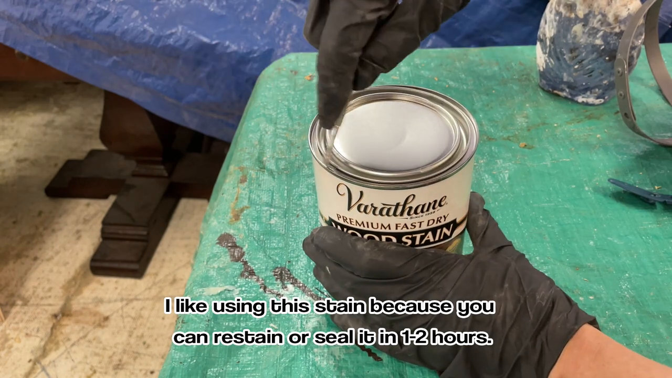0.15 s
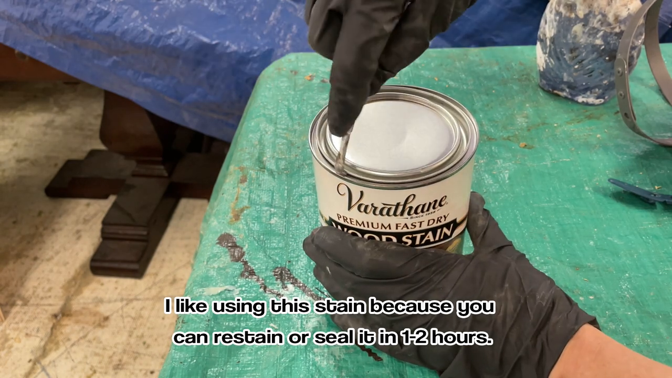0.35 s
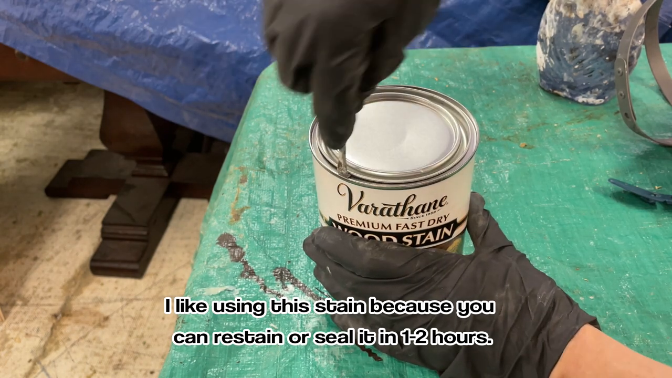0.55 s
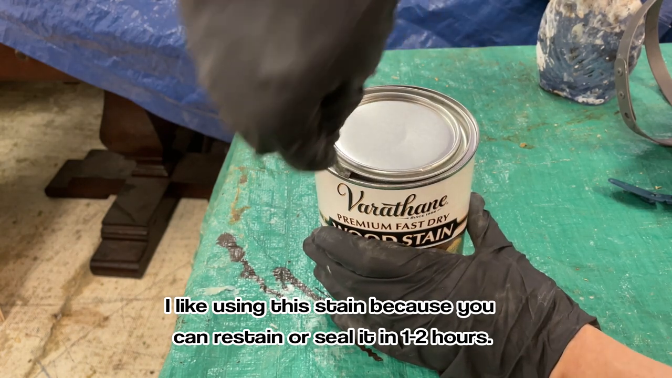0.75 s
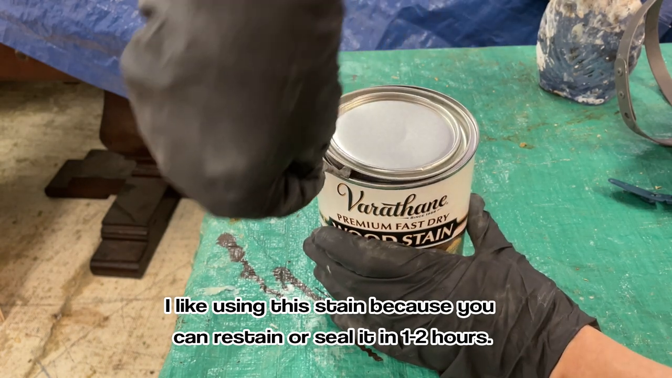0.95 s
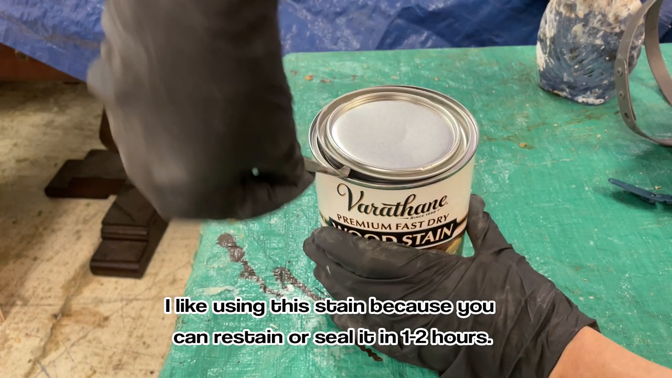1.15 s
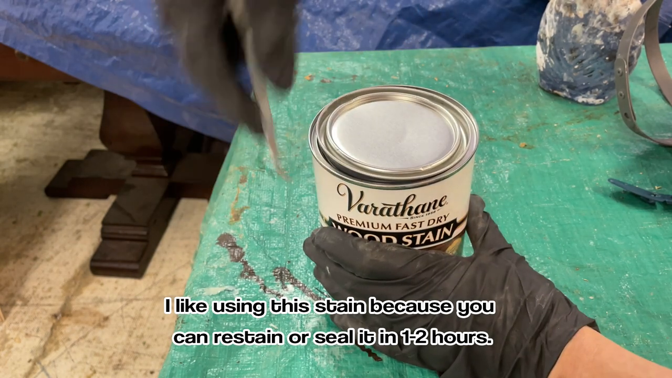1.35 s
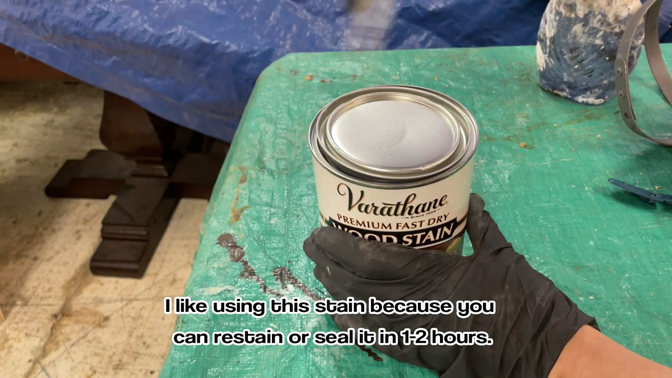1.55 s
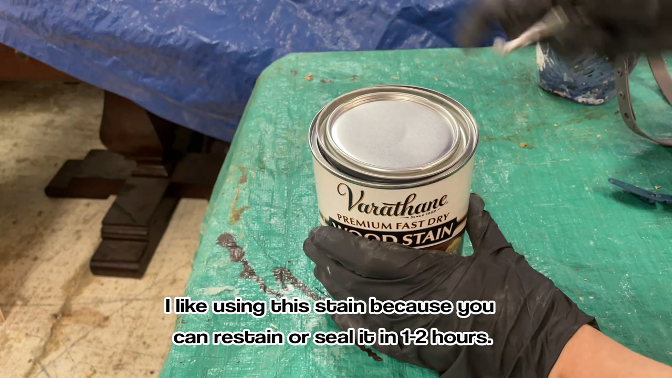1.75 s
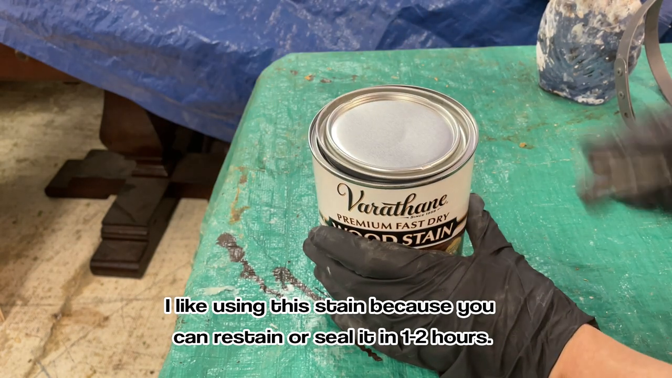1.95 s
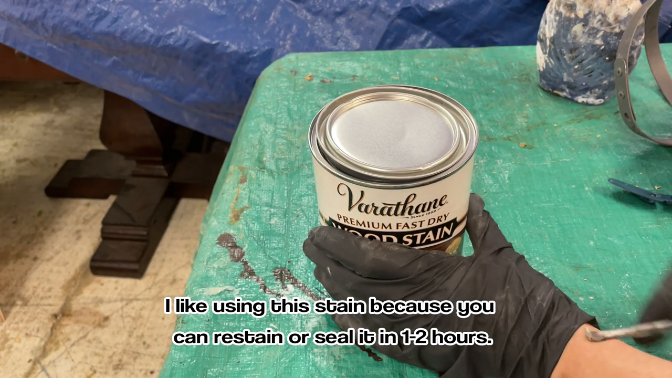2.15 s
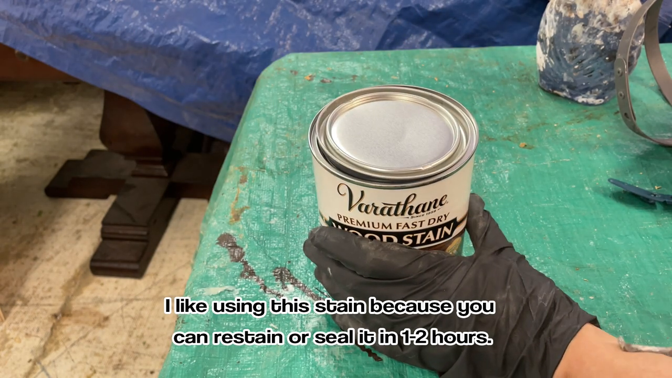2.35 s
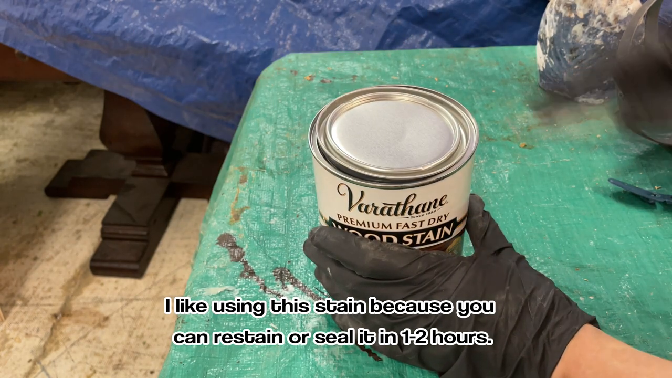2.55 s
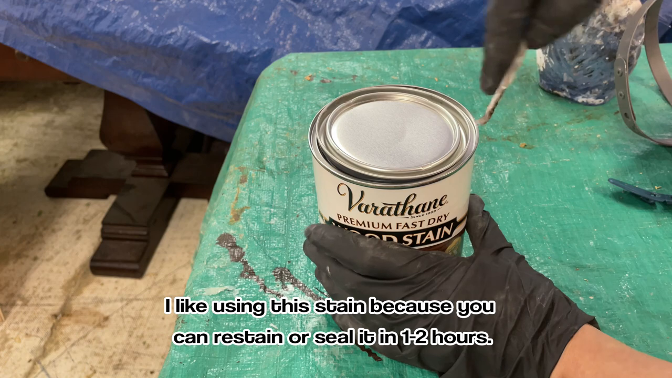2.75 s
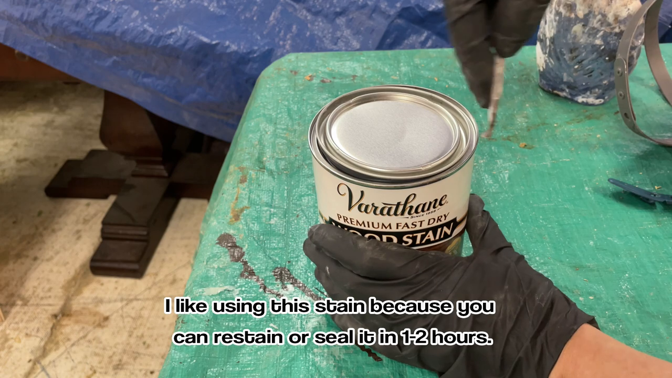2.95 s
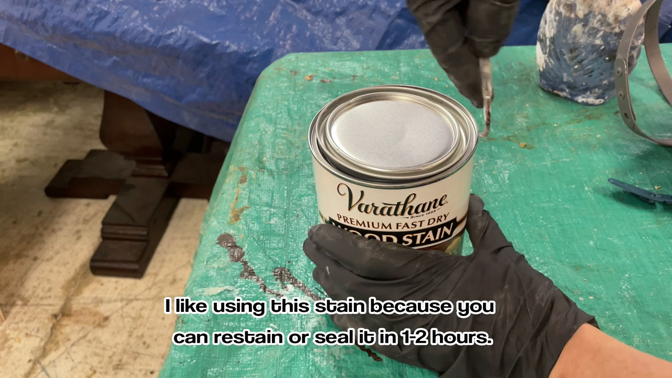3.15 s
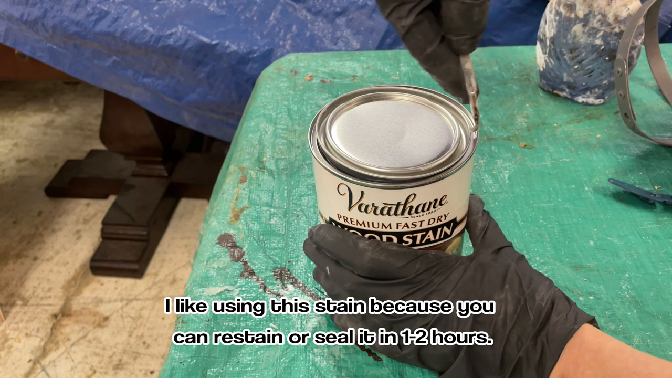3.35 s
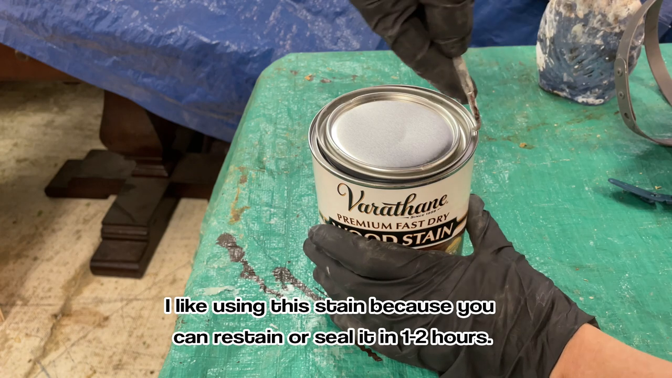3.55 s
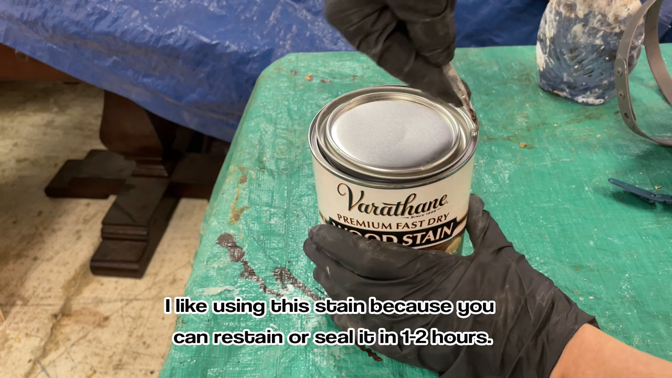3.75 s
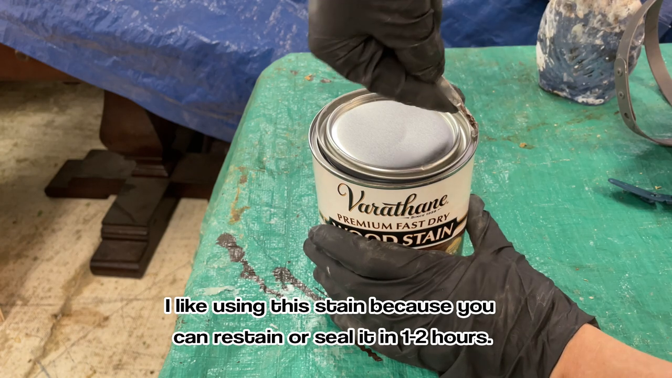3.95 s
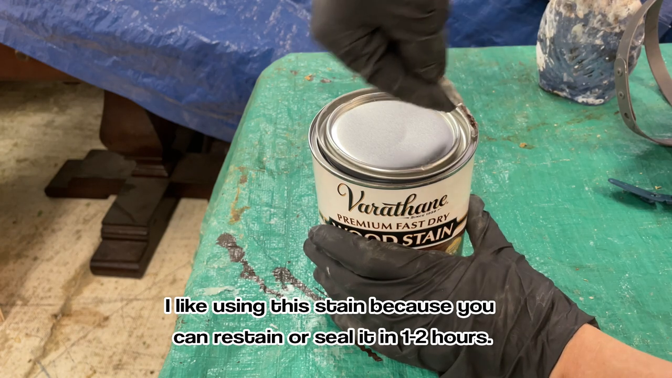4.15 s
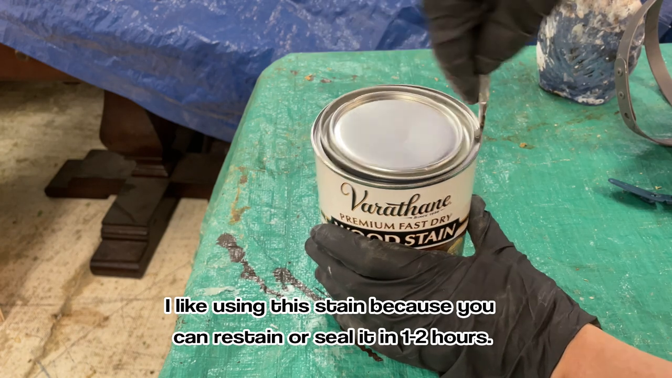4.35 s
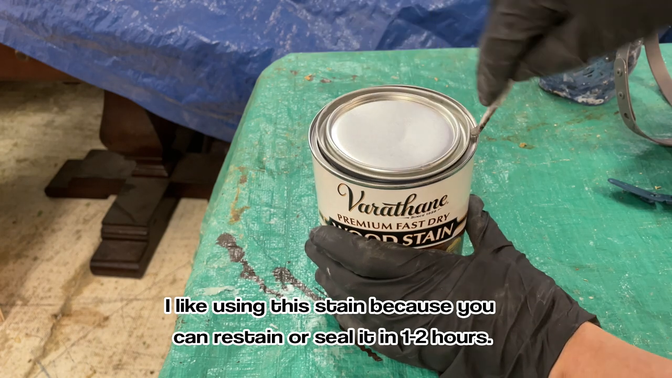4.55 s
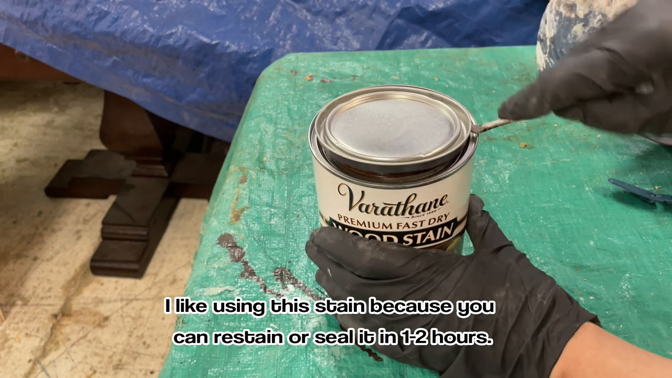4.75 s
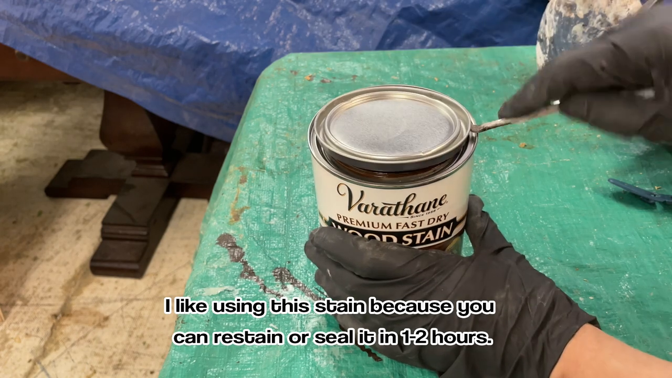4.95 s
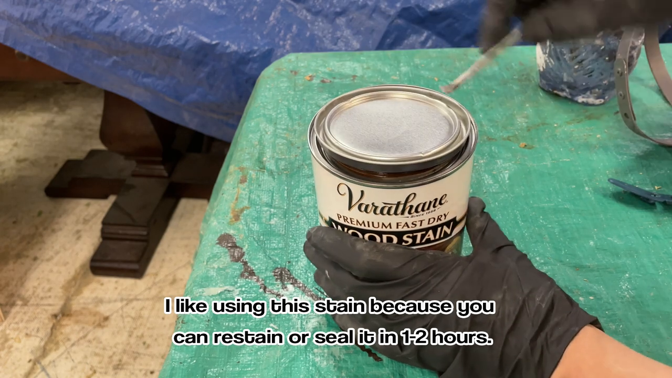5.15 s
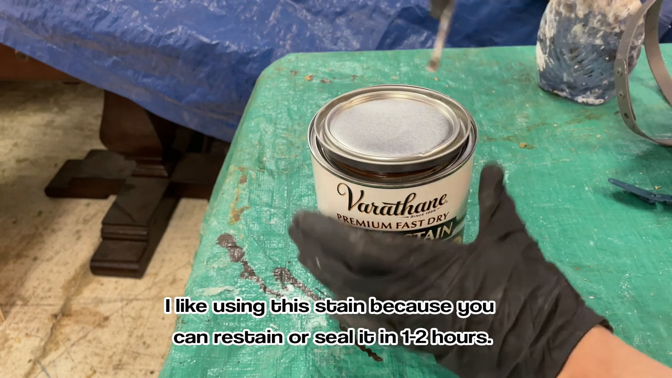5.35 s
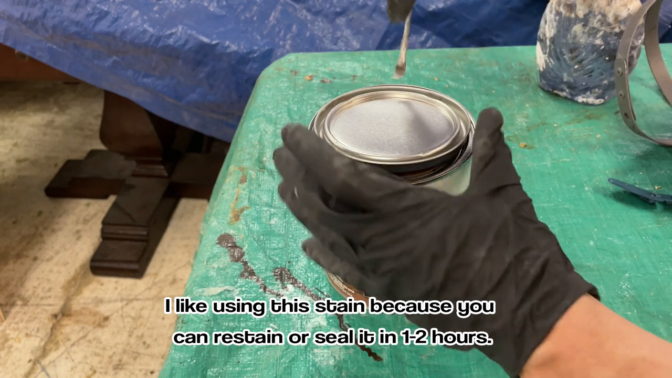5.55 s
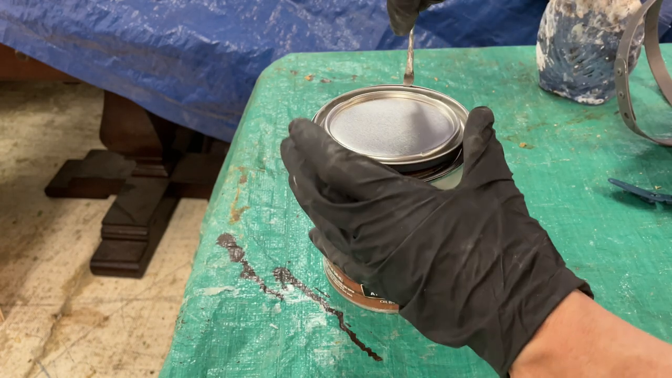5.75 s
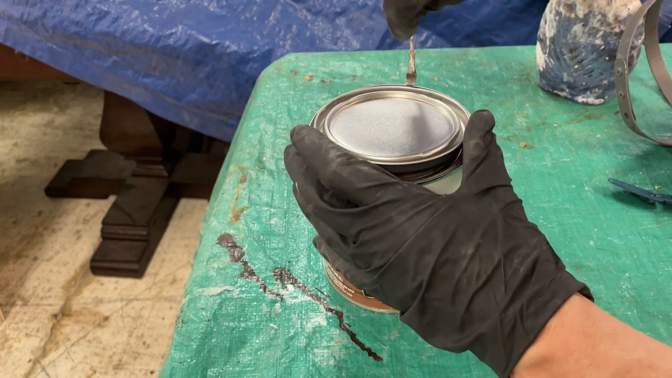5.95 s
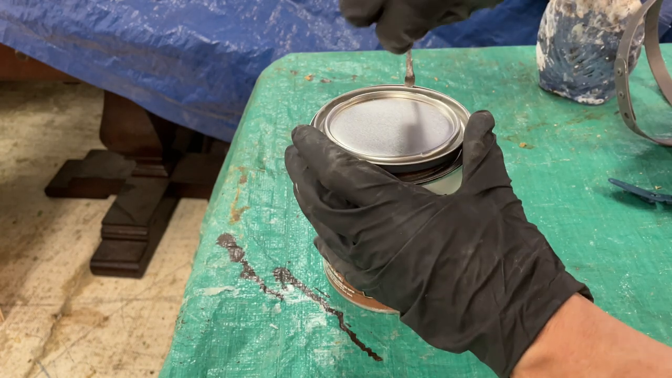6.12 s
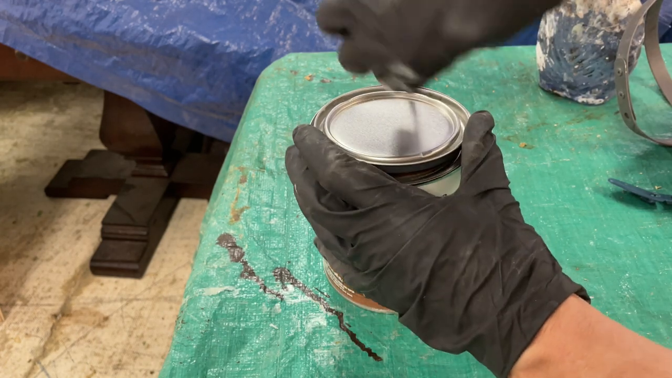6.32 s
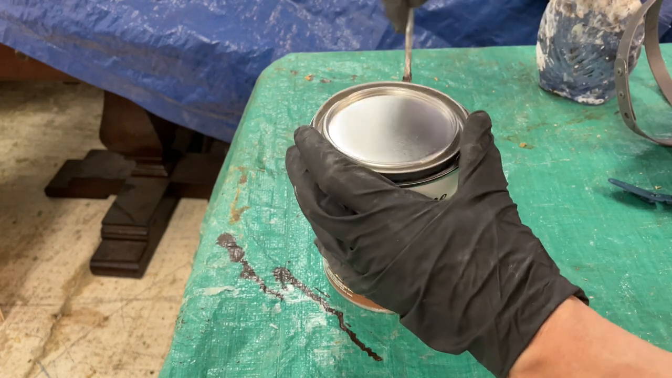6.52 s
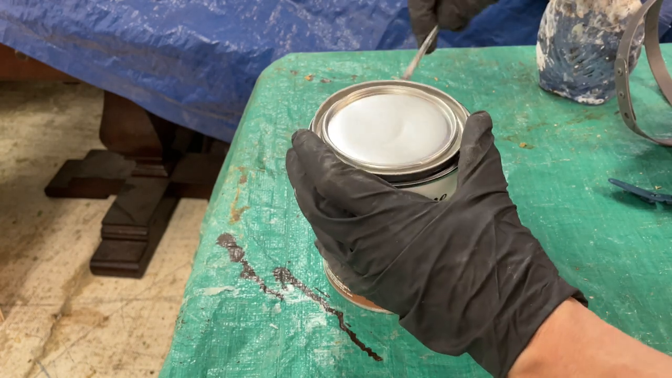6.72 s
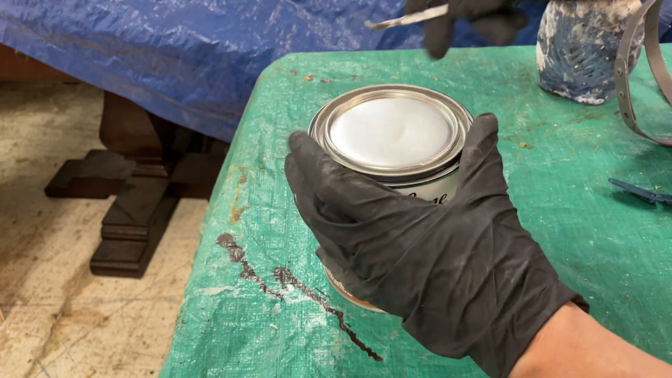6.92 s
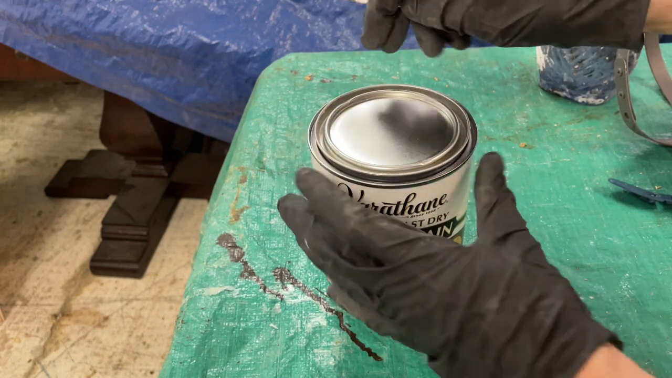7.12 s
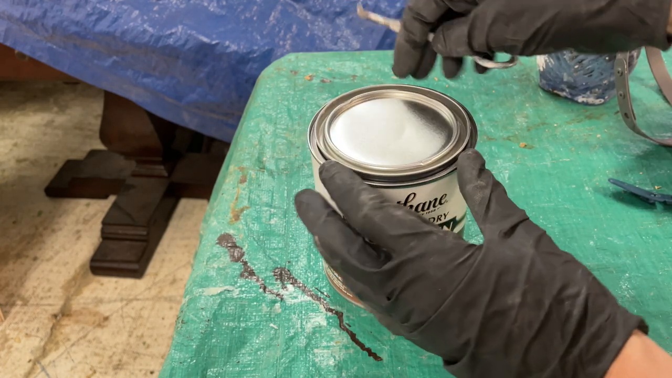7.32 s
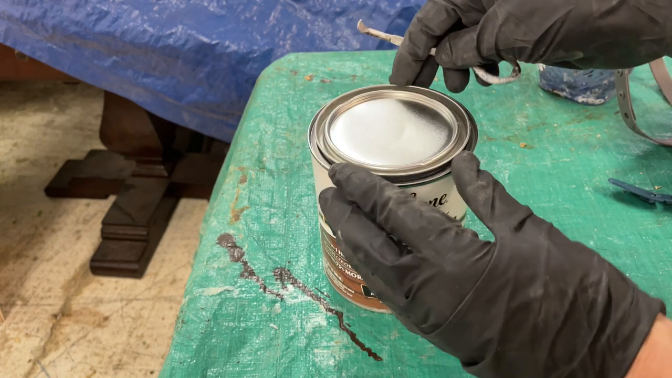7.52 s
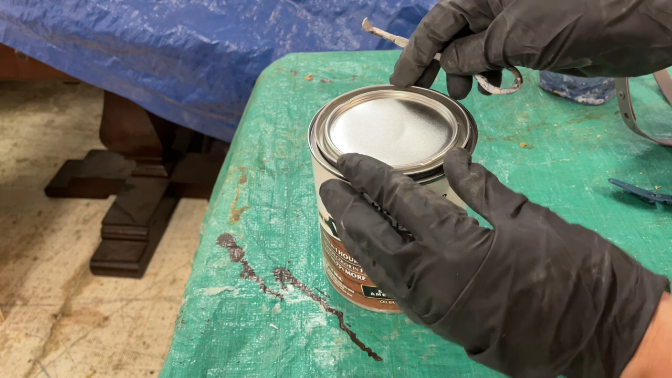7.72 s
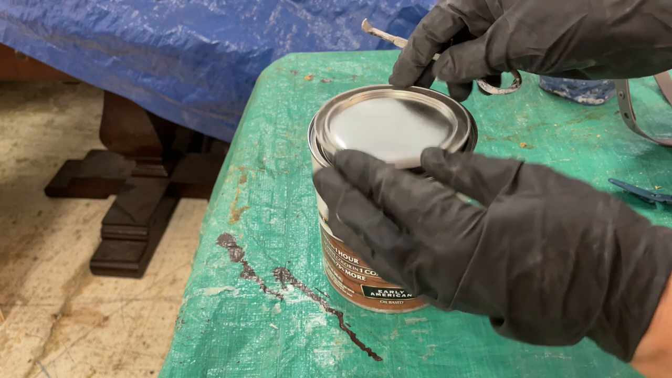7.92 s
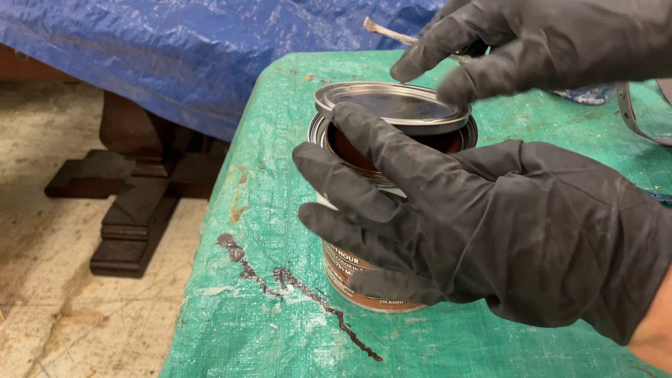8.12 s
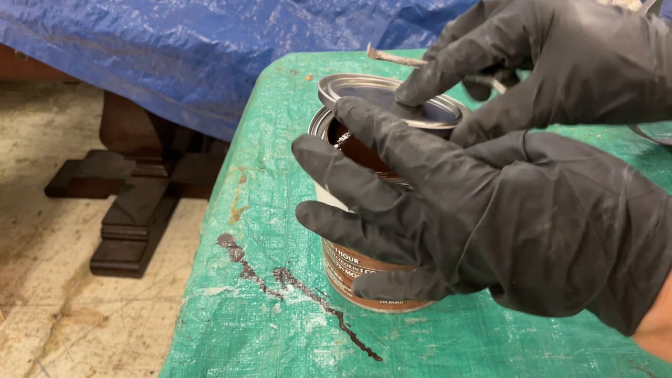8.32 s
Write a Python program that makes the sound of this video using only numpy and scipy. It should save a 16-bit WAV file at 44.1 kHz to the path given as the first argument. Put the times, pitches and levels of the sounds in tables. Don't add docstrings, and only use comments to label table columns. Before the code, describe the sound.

In a small workshop, a steel tool clicks and ticks against the rim of a full tin held in a rubber glove. Gloves rustle, then come more taps and one hard bright clack. A low, round pop marks the seal giving way, followed by a rough scraping drag and looser, more ringing clinks. The end is quiet rubbing and finger ticks. A low fan hum continues throughout; close stereo phone pickup with short room reflections.

```python
import sys
import numpy as np
from scipy import signal
from scipy.fft import rfft, irfft
from scipy.io import wavfile
from scipy.ndimage import uniform_filter1d

SR = 44100
rng = np.random.default_rng(int(sys.argv[2]) if len(sys.argv) > 2 else 0)


def store_wav(level_fs):
    pcm = np.round(np.clip(np.atleast_2d(level_fs), -1, 1) * 32767)
    wavfile.write(sys.argv[1], SR, pcm.T.astype(np.int16))


def gain_from_db(level_db):
    decades = np.asarray(level_db, float) / 20
    return 10 ** decades


N = 373968
FREQ = np.fft.rfftfreq(N, 1 / SR)


def shape(points, hz):
    f, db = np.transpose(points)
    return np.interp(np.log(np.maximum(hz, 1)), np.log(f), db)


def shaped(x, points):
    return irfft(rfft(x) * gain_from_db(shape(points, np.fft.rfftfreq(len(x), 1 / SR))), len(x))


def colour(x, points):
    y = shaped(x, points)
    return y / np.sqrt(np.mean(y ** 2))


def unit(x):
    return x / np.sqrt(np.sum(x ** 2))


def add(out, s, x):
    i = int(s * SR)
    out[i:i + len(x)] += x[:N - i]


def grains(rate, spread_db):
    slipping = rng.random(N) < rate / SR
    return slipping * rng.standard_normal(N) * gain_from_db(spread_db * rng.exponential(size=N))


def walk(rate):
    k = int(SR / rate)
    steps = np.repeat(rng.standard_normal(N // k + 1), k)
    return 1.72 * uniform_filter1d(uniform_filter1d(steps, k), k)[:N]


def swell(s, db, rise_s, fall_s, sharpness=1):
    out = np.zeros(N)
    for at, top_db, rise, fall in zip(s, db, np.maximum(rise_s, 1e-3), np.maximum(fall_s, 1e-3)):
        i = np.arange(max(int((at - 2 * rise) * SR), 0), min(int((at + 2 * fall) * SR), N))
        away = np.maximum((at - i / SR) / rise, (i / SR - at) / fall)
        out[i] += gain_from_db(top_db - 20 * sharpness * away)
    return out


# frequency in Hz, level in dB per Hz.
SHOP_AIR = [(25, -47), (53, -2), (75, 0), (92, -12), (122, -3.5), (150, -11), (250, -13.5), (480, -23.5),
            (700, -24.5), (1070, -28), (2000, -32.5), (6000, -49), (10000, -58.5), (16200, -78)]
# frequency in Hz, rms level in dB, wobble in dB.
FAN_LINES = [(119.1, -54, -4.5), (256.7, -52.5, -0.5)]


def shop():
    spectra = rfft(rng.standard_normal((2, N))) * gain_from_db(shape(SHOP_AIR, FREQ))
    air = 0
    for hz in 30 * 2 ** np.arange(10.):
        octaves = np.log2(np.maximum(FREQ, 1) / hz)
        share = np.cos(np.pi / 2 * np.clip(octaves, -1, 1)) ** 2
        air = air + irfft(spectra * share, N) * gain_from_db(1.36 * walk(2.95))
    t = np.arange(N) / SR
    fan = 0
    for hz, db, wobble_db in FAN_LINES:
        level = gain_from_db(db + 1.0 + wobble_db * walk(1.791))
        fan = fan + level * np.sin(2 * np.pi * hz * t + 0.052 * walk(2.9))
    return gain_from_db(-46) * air / np.sqrt(np.mean(air ** 2)), fan


# frequency in Hz, t60 in seconds.
ROOM_DECAY = [(100, 0.34), (400, 0.46), (1500, 0.28), (5000, 0.22), (12000, 0.16)]


def room(near):
    t, tails = np.arange(SR // 2) / SR, 0
    f = np.fft.rfftfreq(len(t), 1 / SR)
    for hz in 70 * 2 ** np.arange(8.):
        octaves = np.log2(np.maximum(f, 1) / hz)
        band = irfft(rfft(rng.standard_normal((2, len(t)))) * np.exp(-octaves ** 2 * 2))
        tails = tails + band * gain_from_db(-60 * t / shape(ROOM_DECAY, hz))
    tails = tails * np.clip((t - .003) / 0.0019, 0, 1)
    tails = tails / np.sqrt(np.sum(tails[0] ** 2))
    return gain_from_db(-12) * signal.fftconvolve(near[None], tails, axes=1)[:, :N]


# second of most effort, level in dB, rise in seconds, fall in seconds.
RUBS = [(.53, -76.5, .12, 1.2), (1.25, -77, 0.11, 0.14), (1.424, -51, 0.069, 0.034),
        (1.505, -51.5, 0.039, 0.055), (1.65, -54.5, 0.079, 0.22), (1.93, -70, 0.12, 0.33),
        (2.18, -60, 0.13, 0.037), (2.31, -55.5, 0.054, 0.03), (2.46, -60.5, 0.11, 0.09),
        (2.56, -69.5, .02, .21), (4.05, -81, .012, 0.078), (4.356, -70.5, 0.52, 0.21),
        (4.476, -82.5, 0.017, .15), (4.97, -62.5, 0.18, .026), (5.31, -62.5, 0.13, 0.065),
        (5.518, -67.5, 0.26, 0.021), (6.53, -64.5, .02, 1.23), (6.95, -77, .012, 0.048),
        (7.174, -62.5, 0.1, 0.07), (7.285, -73, .04, 0.051), (7.444, -83, .13, 0.019),
        (7.474, -93, 0.029, 1.41), (8.086, -71.5, 0.92, 0.16), (8.22, -63.5, 0.038, 0.013),
        (8.23, -72.5, .02, 0.98)]
# frequency in Hz, level in dB per Hz.
RUBBER_COLOUR = [(500, -50), (1500, -3.5), (3000, 3), (6000, 0.5), (9000, -1), (13000, -26.5),
                 (16000, -8.5)]
# start in seconds, peak in dB.
FINGER_TICKS = [(1.264, -53), (1.495, -65), (1.6212, -46), (1.7544, -53), (2.247, -48), (2.2935, -39),
                (2.4818, -44.5), (2.5812, -52.5), (7.377, -55), (7.5403, -62), (7.6144, -57.5),
                (7.8594, -48), (8.2135, -61), (8.319, -49)]


def gloves():
    creep = grains(6000, spread_db=3.)
    effort = swell(*np.transpose(RUBS)) * gain_from_db(2.0 * walk(60))
    hiss = colour(creep, [(8000, -23.5), (12000, 5.5), (16000, -11.0)])
    out = colour(creep, RUBBER_COLOUR) * effort + gain_from_db(21) * hiss * effort ** 1.57
    t = np.arange(512) / SR
    for s, db in FINGER_TICKS:
        tick = colour(rng.standard_normal(len(t)), RUBBER_COLOUR) * np.exp(-t / 0.0028)
        add(out, s, gain_from_db(db - 8.5) * tick)
    return out


# frequency in Hz, level in dB, t60 in seconds.
TIN_MODES = [(214, -9, 0.3), (368.3, -14.5, 0.085), (503, -2, 0.17), (641, -10.5, 0.3), (722, 3.5, 0.071),
             (826, -1, 0.048), (994, 2, 0.096), (1075, -5, 0.084), (1700, -14.5, 0.25), (1900, -0.5, 0.056),
             (2040, -8.5, 0.029), (2190, -3.5, 0.057), (2470, -9.5, 0.056), (2720, -11, 0.07),
             (2950, -8.5, 0.066), (3110, -9, 0.083), (4080, -4, 0.059), (5110, -9, 0.07), (5300, -15, 0.05),
             (6200, -19, .07), (6900, -33.5, 0.033), (8900, -7, 0.028), (10340, -5, 0.011)]


def ring(db, detune, grip):
    hz, _, t60 = np.transpose(TIN_MODES)[:, :, None]
    t = np.arange(SR // 10) / SR
    return gain_from_db(db) @ (np.sin(2 * np.pi * hz * detune[:, None] * t) * gain_from_db(-60 * t / (t60 * grip)))


# second of most pressure, level in dB, rise in seconds,
# fall in seconds, edge hiss in dB relative to the level.
RIM_SCRAPES = [(0.153, -50, 0.023, 0.013, -23.5), (1.26, -48.5, 0.031, 0.0066, -30.5),
               (4.651, -33.5, 0.012, 0.001, -21.5), (5.01, -43, 0.006, 0.016, -2.5),
               (5.048, -44.5, 0.04, 0.091, -3), (5.101, -42, 0.04, 0.019, 0.5),
               (5.135, -55, 0.042, 0.084, -8.5), (5.187, -40, 0.004, .016, 1.5),
               (6.481, -31, 0.021, 0.0042, -7.5), (6.695, -47, 0.024, 0.059, -8),
               (6.83, -50, 0.05, 0.2, -9.5), (8.172, -52.5, 0.03, 0.074, -15)]


def scrapes():
    slips = grains(6000, spread_db=2.)
    s, db, rise_s, fall_s, edge_db = np.transpose(RIM_SCRAPES)
    body = unit(ring(np.transpose(TIN_MODES)[1], np.ones(len(TIN_MODES)), grip=0.22))
    shaken = signal.fftconvolve(slips * swell(s, db, rise_s, fall_s), body)[:N] / np.sqrt(np.mean(slips ** 2))
    edge = colour(slips, [(2000, -37.0), (4500, 3.0), (7500, 7.5), (11000, -1.0), (16000, -11.0)])
    return gain_from_db(2.5) * shaken + gain_from_db(9.5) * edge * swell(s, db + edge_db, rise_s, fall_s, sharpness=2)


# middle in seconds, length in seconds, resonance in Hz, level in dB.
EDGE_RASPS = [(1.254, 0.023, 2320, -49), (1.259, .016, 1700, -54), (1.7, .12, 4000, -67),
              (5.01, 0.012, 4813, -47), (5.012, 0.015, 8100, -43), (5.011, 0.009, 1306, -34),
              (5.047, 0.032, 4900, -44), (5.048, 0.018, 8200, -33), (5.048, 0.037, 4100, -46.5),
              (5.041, .05, 950, -45), (5.07, 0.068, 641, -50.5), (5.1, .02, 5450, -42.5),
              (5.11, .05, 1180, -47.5), (5.11, 0.043, 2650, -48), (6.7, 0.02, 2360, -44),
              (6.694, 0.023, 6080, -46.5), (6.697, 0.03, 1035, -47.5), (.165, 0.018, 1900, -52),
              (0.2, 0.017, 2400, -53), (0.223, 0.011, 1300, -51), (6.385, .04, 1100, -50),
              (6.385, .03, 2100, -46), (5.03, 0.03, 2640, -50), (7.7, .012, 1700, -54),
              (6.748, 0.012, 2350, -63)]


def rasps():
    out, t = np.zeros(N), np.arange(8192) / SR
    for s, length, hz, db in EDGE_RASPS:
        slips = rng.standard_normal(len(t))
        tone = np.sin(2 * np.pi * hz * t) * gain_from_db(-60 * t / 0.048)
        pressure = np.sin(np.pi * np.clip(t / (1.48 * length), 0, 1)) ** 2
        add(out, s - 0.95 * length, gain_from_db(db) * signal.fftconvolve(slips * pressure, unit(tone)))
    return out


# start in seconds, frequency in Hz, peak in dB, t60 in seconds.
TIN_CLACKS = [(0.0887, 1270, -27.5, 0.024), (.149, 2410, -33.5, 0.028), (.149, 5300, -37, 0.018),
              (.149, 4920, -44, 0.027), (.149, 11900, -42, .025), (.149, 10218, -50, .04),
              (.227, 1040, -34, 0.042), (.227, 4200, -44, .055), (.227, 3270, -46, .07),
              (.227, 5125, -42, .05), (.227, 6500, -32.5, 0.016), (0.32, 1080, -41, .03),
              (1.258, 1120, -41.5, 0.054), (3.131, 2800, -46, .03), (3.131, 3970, -47, 0.025),
              (3.131, 6815, -49, .02), (3.337, 1690, -40, 0.075), (3.338, 2470, -44, .12),
              (3.338, 2890, -45, .1), (3.489, 2860, -50, .04), (3.337, 5060, -45.5, 0.029),
              (3.338, 6891, -44.5, .02), (3.489, 1960, -29, 0.022), (3.556, 2130, -28.5, 0.024),
              (3.556, 1007, -39.5, 0.065), (3.867, 6880, -19, 0.022), (3.867, 4950, -24, 0.021),
              (3.868, 6200, -31, 0.072), (3.869, 2900, -25, 0.1), (3.869, 3130, -24, 0.058),
              (3.868, 2515, -28, 0.13), (3.869, 2684, -29, 0.12), (3.87, 4110, -38.5, 0.087),
              (4.65, 1650, -32, .03), (4.654, 852, -24.5, 0.17), (4.651, 522, -32, 0.15),
              (4.65, 5150, -32.5, 0.035), (4.6506, 2720, -17, 0.0061), (4.6508, 1470, -19, 0.0088),
              (3.885, 497, -32, 0.17), (3.543, 1900, -46, .02), (.0885, 5040, -46, 0.027),
              (5.007, 2010, -28, 0.033), (5.007, 641, -34.5, 0.16), (5.007, 1304, -30, 0.057),
                (5.007, 4120, -43, .04), (5.183, 641, -25.5, 0.11), (5.183, 2950, -32, .05),
                (5.184, 4050, -32.5, 0.071), (5.183, 7720, -21, 0.031), (5.183, 10160, -32.5, 0.043),
                (5.186, 2370, -29, .05), (5.184, 6320, -39, 0.083), (5.184, 4760, -38.5, 0.072),
                (5.183, 1174, -29.5, 0.22), (5.7195, 2326, -31, 0.023), (5.7195, 1675, -37, 0.1),
                (5.7195, 6210, -33.5, 0.027), (5.828, 2650, -48, 0.15), (5.971, 1026, -31, 0.042),
                (5.971, 2040, -28, 0.077), (5.971, 11400, -33, .02), (5.971, 4081, -38, 0.039),
                (6.1548, 1660, -20.5, 0.039), (6.1548, 2140, -21.5, 0.026), (6.1548, 5260, -19, 0.032),
                (6.1585, 3260, -21.5, 0.021), (6.1548, 7490, -14.5, .02), (6.159, 2424, -28, 0.05),
                (6.159, 1160, -33, .14), (6.159, 6430, -35, 0.073), (6.363, 2230, -20.5, 0.018),
                (6.363, 3020, -28.5, 0.022), (6.364, 5100, -41, 0.044), (6.364, 2650, -41, 0.12),
                (6.366, 894, -33, 0.088), (6.4795, 5520, -22.5, 0.015), (6.4795, 2350, -22, 0.014),
                (6.4795, 7300, -28, .025), (6.4795, 9360, -27.5, .025), (6.4795, 10551, -37.5, .03),
                (6.893, 2930, -41, .015), (6.482, 375, -30, 0.089), (6.777, 3310, -35, .015),
                (6.777, 2440, -33, 0.06), (6.802, 2485, -33.5, 0.047), (6.913, 1250, -39.5, 0.024),
                (6.482, 1140, -38, .06), (6.913, 2600, -44, .015), (5.828, 1806, -28.5, 0.031),
                (6.777, 800, -28.5, 0.06), (6.802, 860, -27.5, 0.062)]


def clacks():
    out, t = np.zeros(N), np.arange(SR // 4) / SR
    for s, hz, db, t60 in TIN_CLACKS:
        t60 = max(t60, .004)
        onset = 1 - np.exp(-t / 0.00016)
        choke = np.exp(-(t / (.46 * t60)) ** 3)
        add(out, s, gain_from_db(db - 60 * t / t60) * np.sin(2 * np.pi * hz * t) * onset * choke)
    return out


# frequency in Hz, level in dB, t60 in seconds.
SEATED_MODES = [(446.4, 2.5, 0.075), (726, 0.7, 0.052), (830, -1, 0.074), (972, -8, 0.1),
                (1007.8, 9.5, 0.018), (1270, -11.5, 0.025), (1690, -3, 0.027), (1920, 9.5, 0.014),
                (2060, -2, 0.023), (2280, -4, 0.022), (2455, -19, 0.04), (2860, -24, .12),
                (4790, -16, 0.022), (6970, 1, 0.015)]
FREED_MODES = [(658, -6, 0.16), (741, -0.4, 0.068), (862, -5, 0.28), (1015, 4.5, 0.04), (1174, -3.5, 0.3),
               (1640, 3.5, 0.027), (1950, -5, 0.078), (2190, -6, 0.068), (2445, 2, 0.09), (2646, -9, 0.24),
               (3350, 1, 0.02), (4790, 1.5, 0.039), (5400, 5.5, 0.013), (6830, -7, .045)]
# start in seconds, wall frequency in Hz, wall level in dB, rim frequency in Hz, rim level in dB.
SEATED_CONTACTS = [(0.0885, 723, -25, 1900, -26), (0.13, 1280, -24.5, 2060, -60),
                   (0.148, 449.6, -34, 1920, -35.5), (0.226, 1023, -29.5, 1750, -25.5),
                   (0.296, 970, -42, 2060, -41), (0.321, 446.3, -43, 1900, -35.5),
                   (0.459, 1060, -46, 2060, -66), (1.26, 1022, -37.5, 1270, -41),
                   (2.945, 460, -60, 1905, -43), (3.131, 1945, -34.5, 2280, -56),
                   (3.336, 750, -35, 997, -33), (3.489, 453, -29.5, 1070, -27.5),
                   (3.556, 2090, -29, 2500, -40), (3.867, 976, -28, 1994, -14.5),
                   (3.868, 4790, -17.5, 6970, -27), (3.869, 1690, -29.5, 2880, -24.5),
                   (3.4895, 1750, -34, 2200, -29.5), (0.227, 2455, -43, 1690, -28),
                   (3.337, 1570, -36, 2370, -38), (4.65, 726, -30, 503, -36)]
FREED_CONTACTS = [(5.1825, 637, -27.5, 862, -37), (5.183, 1990, -26.5, 2646, -27),
                  (5.7195, 663, -27, 1061, -27), (5.72, 2646, -27.5, 3350, -34),
                  (5.827, 990, -26, 1900, -40), (5.971, 1470, -24.5, 2414, -29.5),
                  (6.154, 863, -26, 2140, -26), (6.155, 3350, -25, 6050, -29),
                  (6.3627, 1007, -30, 2280, -28), (6.4795, 698, -24.5, 5390, -29),
                  (6.7768, 730, -27.5, 865, -38), (6.8015, 741, -27, 900, -36),
                  (6.911, 1210, -46, 2340, -58), (5.828, 1640, -36.5, 5300, -36),
                  (5.973, 1015, -30.5, 5400, -31)]
DRAGS = [
    (0.138, 2445, -54, 5400, -60),
    (1.242, 2408, -50, 1970, -56),
    (1.492, 4800, -46, 5400, -45),
    (1.635, 2445, -52.5, 3350, -55),
    (5.003, 1173, -27, 1985, -29),
    (5.038, 1970, -27.5, 4800, -43.5),
    (5.062, 1174, -36.5, 2646, -34),
    (5.091, 1172, -35, 5470, -33),
    (6.685, 1016, -41, 2365, -28.5),
    (6.685, 5540, -28, 6830, -45),
]
DRAG_S = 0.0204


def singing(split=.012, twin_db=-7., rise_ms=1.2, choke_s=.055):
    out, t = np.zeros(N), np.arange(SR // 7) / SR
    grip = np.exp(-(t / choke_s) ** 3) * (1 - np.exp(-t * 1000 / rise_ms))
    for modes, contacts, drag_s in ((SEATED_MODES, SEATED_CONTACTS, 0), (FREED_MODES, FREED_CONTACTS, 0),
                                    (FREED_MODES, DRAGS, DRAG_S)):
        hz, mode_db, t60 = np.transpose(modes)[:, :, None]
        damp_db_per_s = 498 if drag_s > 0 else 0
        fade = gain_from_db(mode_db - 60 * t / t60 - damp_db_per_s * t) * grip
        for s, wall_hz, wall_db, rim_hz, rim_db in contacts:
            reach = 0
            for at_hz, db in ((wall_hz, wall_db), (rim_hz, rim_db)):
                octaves = max(0.073 + 0.09 * (db + 27), .02)
                reach = reach + gain_from_db(db) * np.exp(-(np.log2(hz / at_hz) / octaves) ** 2)
            twin_hz = hz * (1 + split * (2 * rng.random((len(modes), 1)) - 1))
            pair = np.sin(2 * np.pi * hz * t) + gain_from_db(twin_db) * np.sin(2 * np.pi * twin_hz * t)
            push = rng.standard_normal(2048) * (np.arange(2048) <= drag_s * SR)
            push[0] = 1
            add(out, s, signal.fftconvolve(np.sum(reach * fade * pair, axis=0), unit(push)))
    return out


# start in seconds, peak in dB near 2.4 kHz, then thud, wall and edge in dB relative to it.
BLOWS = [(0.0891, -35.5, 17.5, 4.5, -8.5), (0.1488, -39.5, -12, -4, 2), (0.2266, -23.5, -2, -10.5, -15),
         (0.3206, -43.5, 1, 4, -7), (2.9449, -33.5, 1, -12.5, -19.5), (3.1315, -37, -23, -5, -6.5),
         (3.3367, -23.5, -4, -6.5, -36), (3.489, -30.5, 7.5, 5.5, -54), (3.5563, -26.5, -4, -9, -16),
         (3.8669, -12, -26, -12.5, -7.5), (4.6498, -27.5, 7, -3.5, -3), (5.0073, -28, -21.5, -12.5, -9),
         (5.0477, -37, -13, -20, 0), (5.1824, -19, -6, -4.5, 0), (5.7195, -27.5, -1.5, 3.5, -10),
         (5.8277, -28.5, -9, 10, -26), (5.971, -19, -27, 0, -2), (6.1545, -18.5, -25, -16, -1),
         (6.1584, -22, 7, 2, 1), (6.3632, -23, -6, 3.5, -3.5), (6.4795, -23, 17, -16, -3.5),
         (6.7774, -25, -30, -8, -14), (6.8019, -27.5, -4, -7, -2.5), (6.9128, -34.5, -10, -21, -15.5)]
# start in seconds, peak in dB, thud in dB relative to it.
LID_REBOUNDS = [
    (3.8708, -31.5, 15.5),
    (3.8748, -21.5, 15),
    (3.882, -22, 16),
    (5.0146, -32.5, 1.5),
    (5.2096, -31, 11.5),
]
# start in seconds, peak in dB, wall in dB relative to it.
LIGHT_TOUCHES = [
    (0.2977, -53, 11),
    (0.4582, -66.5, 23),
    (3.6964, -64.5, -12),
    (5.322, -43, -30),
    (6.3021, -48.5, 7),
    (6.385, -43.5, 11.5),
    (6.42, -41.5, 1),
    (6.599, -43, 1),
]


def hits(crack_ms=1.65, crack_db=4.0, ring_db=-11.5, scatter_db=4.0, chatter_ms=9.0, graze_db=-24.0, graze_ms=5.2):
    out, (hz, mode_db, _) = np.zeros(N), np.transpose(TIN_MODES)
    t = np.arange(2048) / SR
    rebounds = [(s, db, thud_db, -9.5, -32) for s, db, thud_db in LID_REBOUNDS]
    touches = [(s, db, 15.5, wall_db, -11) for s, db, wall_db in LIGHT_TOUCHES]
    for s, db, thud_db, wall_db, edge_db in [*BLOWS, *rebounds, *touches]:
        blow = [(50, thud_db - 31.0), (120, thud_db - 14.0), (300, thud_db), (900, wall_db), (2400, 0.0085),
                (3900, edge_db / 2 - 9.5), (6000, edge_db), (12000, edge_db - 12), (15300, edge_db - 18),
                (16400, edge_db - 27)]
        level_chance, pitch_chance = rng.standard_normal((2, len(TIN_MODES)))
        body = ring(mode_db + shape(blow, hz) + scatter_db * level_chance, 1 + 0.02 * pitch_chance, grip=0.49)
        bounces = rng.random(len(t)) < .03
        chatter = rng.standard_normal(len(t)) * bounces * np.exp(-t * 1000 / chatter_ms)
        chatter[0] = 0.24
        add(out, s, gain_from_db(db + ring_db) * signal.fftconvolve(unit(chatter), body))
        noise = shaped(rng.standard_normal(len(t)), blow)
        crack = 2.9 * noise * np.exp(-t * 1000 / crack_ms) * np.minimum(t / 0.0011, 1)
        add(out, s, gain_from_db(db + crack_db) * crack)
        add(out, s - len(t) / SR, gain_from_db(db + graze_db) * noise * np.exp(-t[::-1] * 1000 / graze_ms))
    return out


# start in seconds, peak in dB.
SEAL_POP = [
    (4.651, -8.5),
    (4.671, -21.5),
    (4.68, -26),
    (4.701, -30.5),
    (4.717, -38),
]


def pop(start_hz=520, end_hz=95.5, t60_s=0.049):
    out, t = np.zeros(N), np.arange(SR // 10) / SR
    hz = end_hz + (start_hz - end_hz) * np.exp(-t / 0.0046)
    cycles = np.sin(2 * np.pi * np.cumsum(hz) / SR)
    thump = 2.46 * cycles * gain_from_db(-60 * t / t60_s) * (1 - np.exp(-t / 0.0021))
    for s, db in SEAL_POP:
        add(out, s, gain_from_db(db) * thump)
    return out


# frequency in Hz, left minus right in dB.
CLOSE_BALANCE = [(200, .5), (550, 4.5), (900, -1), (1400, 0), (2400, -1.5), (5500, -2), (8200, 1),
                 (15000, 0)]
# frequency in Hz, lead of the right port in radians for close sound.
CLOSE_LEAD = [(200, .35), (550, -.45), (900, -.15), (1350, -.4), (1900, 0), (12500, .2), (14500, .8),
              (16200, 1.2)]
# frequency in Hz, lead of the right in radians, left minus right in dB,
# likeness of distant sound from 0 to 1.
PHONE_PORTS = [(0, 0, -3, .97), (200, 0, -5, .95), (700, .1, -3, .15), (1700, .3, 1, .3),
               (2100, -.6, 2, .2), (3000, -.6, 1.5, .45), (5200, -.6, 3, .5), (8150, 3.14, .3, .93),
               (10200, 5.1, 0, .7), (11500, 6.28, 0, .98), (13200, 7.6, 0, .5), (15000, 8.8, 0, .9),
               (17000, 9.3, 0, .8)]


def scene():
    near, rings, thump, struck = hits() + scrapes() + gloves(), singing(), pop(), clacks()
    air, fan = shop()
    to_room = near + gain_from_db(-10) * rings + gain_from_db(-5) * struck + gain_from_db(-8) * thump
    first, second = rfft(air + room(to_room))
    hz, _, _, likeness = np.transpose(PHONE_PORTS)
    alike = np.clip(np.interp(FREQ, hz, likeness), 0, 1)
    far = irfft(np.array([first, alike * first + np.sqrt(1 - alike ** 2) * second]), N)
    lean = gain_from_db(shape(CLOSE_BALANCE, FREQ) / 2) * np.exp(-.5j * shape(CLOSE_LEAD, FREQ))
    close = irfft(rfft(near + rings + thump + struck + rasps()) * np.array([lean, 1 / lean]), N)
    return close + fan + far


def low_pass(x):
    return signal.sosfilt(signal.butter(12, 15800, fs=SR, output="sos"), x)


def record(dry):
    hz, lead, balance_db, _ = np.transpose(PHONE_PORTS)
    half = gain_from_db(np.interp(FREQ, hz, balance_db) / 2) * np.exp(-.5j * np.interp(FREQ, hz, lead))
    mix = irfft(rfft(dry) * np.array([half, 1 / half]), N)
    return low_pass(mix)


dry = scene()
out = record(dry)
store_wav(out)
```